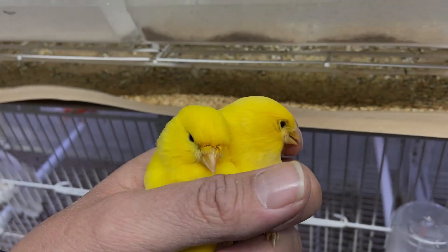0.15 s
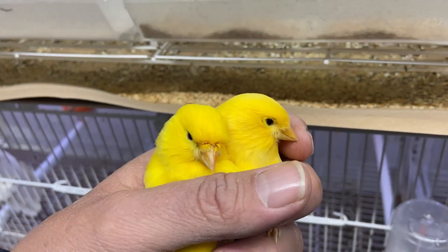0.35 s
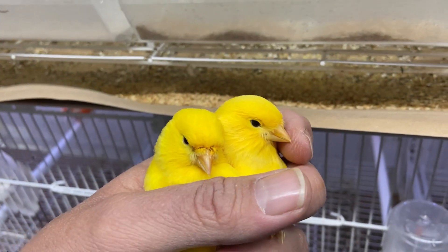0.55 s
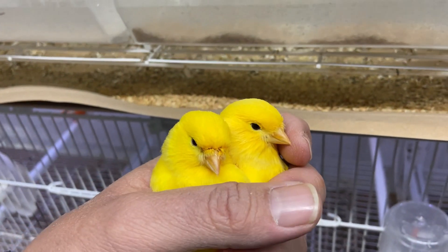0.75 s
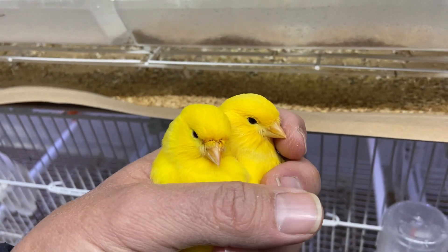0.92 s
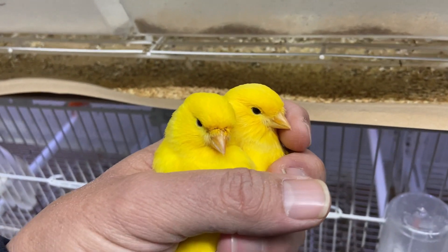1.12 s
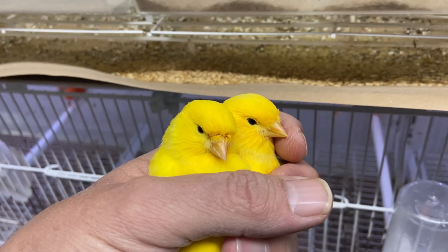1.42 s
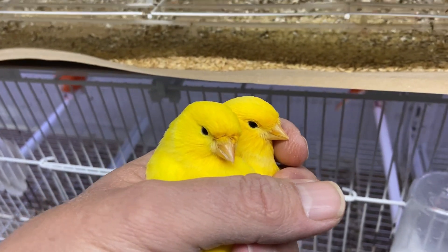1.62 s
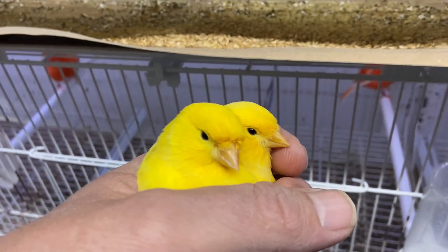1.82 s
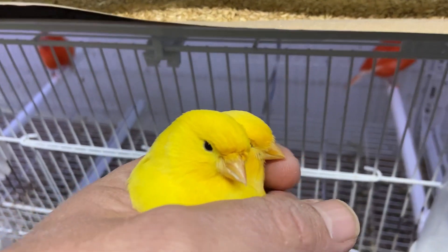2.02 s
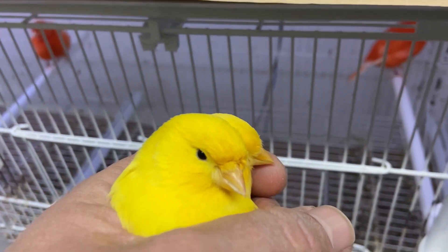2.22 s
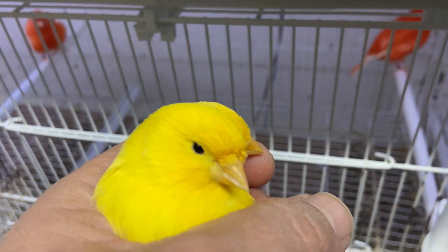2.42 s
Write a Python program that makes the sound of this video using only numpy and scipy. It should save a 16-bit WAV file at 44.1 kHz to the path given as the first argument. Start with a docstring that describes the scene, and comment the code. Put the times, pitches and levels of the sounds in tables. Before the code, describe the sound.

A canary trills in fast, high repeated notes close by in an indoor aviary.

```python
"""A canary trills close by in an indoor aviary: each nearly pure note holds near 3 kHz, then slurs down
and interferes with its own echoes. Another bird throws in a squeal and a few whistles, and faint cheeps
come from other cages. Hands rustle and bump near the microphone, and cage wire ticks over faint room
noise. Just past halfway, the sound drops out twice for an instant."""
import sys
import numpy as np
from scipy import signal
from scipy.fft import rfft, irfft, next_fast_len
from scipy.io import wavfile
from scipy.ndimage import uniform_filter1d

SR = 44100
rng = np.random.default_rng(int(sys.argv[2]) if len(sys.argv) > 2 else 0)


def to_wav(s):
    """Save 16-bit WAV."""
    ch = np.atleast_2d(s).T  # columns
    pcm = np.round(np.clip(ch, -1, 1) * 32767)  # PCM
    wavfile.write(sys.argv[1], SR, pcm.astype(np.int16))


N = 112454
T = np.arange(N) / SR
FREQS = np.fft.rfftfreq(N, 1 / SR)
RELEASE_S = 0.0017  # of every bird note


def canary_trill(attack_s=0.019, slur_s=0.0205, slur_fade_db=8, fundamental_db=-0.89):
    """Frequency and amplitude modulation: notes swell on a held pitch, then fade as they slur down."""
    # (start [s], hold [s], first pitch [Hz], pitch ending the hold [Hz], last pitch [Hz],
    #  relative level [dB], swell over the hold [dB])
    notes = [(-0.0115, 0.0495, 2735, 2852, 2574, -33, 7), (0.086, 0.04, 2995, 3008, 2820, -23, 6.5),
             (0.182, 0.041, 3018, 3062, 2803, -23.5, 24), (0.282, 0.038, 3015, 3090, 2710, -22.5, 18.5),
             (0.38, 0.039, 3042, 3089, 2706, -22, 26.5), (0.481, 0.033, 3015, 3076, 2710, -21.5, 24.5),
             (0.5729, 0.042, 3010, 3084, 2800, -22, 24.5), (0.6805, 0.04, 3080, 2980, 2645, -24.5, -2),
             (0.777, 0.038, 3048, 3020, 2650, -23, 3.5), (0.8807, 0.032, 2995, 2999, 2657, -22, -1),
             (0.98, 0.039, 3042, 2950, 2604, -24, 0.5), (1.083, 0.045, 3063, 2897, 2526, -26.5, 3.5),
             (1.1756, 0.052, 3115, 2872, 2560, -25, 7), (1.292, 0.0415, 3060, 2843, 2515, -26.5, -1),
             (1.391, 0.065, 2984, 2872, 2330, -25.5, 2.5), (1.517, 0.042, 3060, 2875, 2400, -25, 23.5),
             (1.625, 0.039, 3066, 2846, 2420, -25.5, 1), (1.729, 0.0405, 2995, 2923, 2490, -24.5, 3.5),
             (1.833, 0.044, 3064, 2940, 2530, -23.5, 11), (1.94, 0.041, 3003, 2867, 2440, -23.5, 9.5),
             (2.0473, 0.045, 3016, 2892, 2496, -22.5, 4.5), (2.1557, 0.042, 3018, 2864, 2510, -22, 12.5),
             (2.2589, 0.045, 2998, 2856, 2530, -22.5, 2), (2.369, 0.039, 3058, 2890, 2460, -21.5, 4.5),
             (2.4758, 0.044, 2997, 2872, 2460, -25.5, -1)]
    # harmonics 2 to 5 (relative level [dB])
    overtones_db = [-33.5, -29, -35, -40.5]
    pure, overtones = np.zeros((2, N))
    waver = 1 + 0.001 * wander(300)
    flutter_db = 0.7 * wander(70)
    for start, hold, first_hz, knee_hz, last_hz, db, swell_db in notes:
        on = (T >= start) & (T < start + hold + slur_s)
        t = T[on] - start
        held = np.minimum(t / hold, 1)
        slur = np.clip((t - hold) / slur_s, 0, 1)
        hz = first_hz + (knee_hz - first_hz) * held + (last_hz - knee_hz) * slur ** 1.1
        phase = 2 * np.pi * np.cumsum(hz * waver[on]) / SR
        gate = np.minimum(t / attack_s, 1) * np.clip((hold + slur_s - t) / RELEASE_S, 0, 1)
        contour_db = flutter_db[on] - swell_db * (1 - held) - slur_fade_db * slur
        pure[on] += gate * amp(db + fundamental_db + contour_db) * np.sin(phase)
        harmonics = sum(amp(level) * np.sin(k * phase) for k, level in enumerate(overtones_db, 2))
        overtones[on] += gate * amp(db) * (1 - slur) ** 3 * harmonics
    tail = reverberation(pure + overtones, right_db=-5)
    return early_reflections(pure) + at_ears(overtones, right_db=-1) + tail


def second_bird():
    """Harmonic tones plus hiss; the squeal and the main whistle peak on their second harmonic."""
    # contours of six calls (time [s], pitch [Hz], relative level [dB])
    squeal = [(1.15, 2480, -41), (1.162, 2820, -27), (1.185, 3075, -31.5), (1.205, 3012, -33),
              (1.222, 2770, -24.5), (1.238, 2780, -51)]
    whistle = [(1.205, 2320, -55), (1.228, 2331, -21.5), (1.25, 2357, -17), (1.285, 2340, -22.5),
               (1.305, 2266, -43), (1.325, 2400, -60)]
    low_whistle = [(1.21, 2302, -37.5), (1.25, 2376, -59), (1.32, 2294, -46.5), (1.352, 2308, -26.5),
                   (1.372, 2296, -35.5), (1.39, 2190, -44)]
    peep = [(1.258, 3900, -35), (1.28, 3997, -32.5), (1.31, 4090, -55), (1.332, 4050, -36.5),
            (1.348, 4007, -21), (1.365, 4270, -67), (1.4, 4010, -50)]
    chirp = [(1.19, 3400, -55), (1.21, 3620, -30), (1.24, 3840, -46)]
    rasp = [(1.395, 3445, -60), (1.408, 3560, -38), (1.43, 3545, -43), (1.465, 3596, -55),
            (1.52, 3590, -58)]
    # envelope of the hiss in the voice (time [s], level [dB])
    hiss_envelope = [(1.13, -77), (1.155, -45.5), (1.195, -41), (1.225, -34), (1.26, -42), (1.34, -41.5),
                     (1.385, -61), (1.415, -47), (1.47, -57), (1.52, -72)]
    # its spectrum (frequency [Hz], relative density [dB])
    hiss_spectrum = [(1500, -26.5), (2500, -3.5), (3600, 6.5), (5300, -2), (6500, -7.5), (8000, -10),
                     (9200, -24.5), (11500, -8.5), (13200, -10), (15000, -13)]
    # interaural level difference (frequency [Hz], right-ear gain [dB])
    right_ear = [(2000, -4), (5000, -7.5), (8000, -8.5), (16000, 4)]
    voice = (bird_call(squeal, harmonics_db=[-14, 1, -29, -22, -23], jitter=0.01, jitter_hz=605)
             + bird_call(whistle, harmonics_db=[-25.5, 2, -21, -22, -25, -38],
                         jitter=0.0016, jitter_hz=297)
             + bird_call(low_whistle, harmonics_db=[0, -14], jitter=0.0015, jitter_hz=200)
             + bird_call(peep, harmonics_db=[0, -13, -24], jitter=0.024, jitter_hz=500)
             + bird_call(chirp, harmonics_db=[0, -14], jitter=0.015, jitter_hz=600)
             + bird_call(rasp, harmonics_db=[9, -1.5, -7, -7], jitter=0.0206, jitter_hz=620))
    hiss = modulated_noise(hiss_spectrum, hiss_envelope, flicker_db=3, flicker_hz=100)
    direct = at_ears(voice, right_db=log_curve(right_ear, FREQS))
    return direct + amp(-6) * reverberation(voice, right_db=-3.5) + hiss


def distant_cheeps(arch_db=12):
    """Beyond the critical distance, reverberation outweighs the direct sound of other cages' birds."""
    # short glides (start [s], length [s], first pitch [Hz], last pitch [Hz], relative level [dB])
    cheeps = [(0.242, .06, 3820, 4066, -56.5), (0.257, 0.068, 3280, 3390, -50),
              (0.36, 0.056, 2405, 2255, -49.5), (1.201, 0.016, 5250, 5050, -30.5),
              (1.56, 0.024, 4810, 4870, -54.5), (1.568, 0.028, 3400, 3290, -49),
              (1.595, 0.023, 5480, 5270, -56), (1.945, 0.031, 2086, 2100, -52.5),
              (2.174, 0.021, 3615, 3570, -41)]
    voice = np.zeros(N)
    for start, length, first_hz, last_hz, db in cheeps:
        arch = [(start, first_hz, db - arch_db),
                (start + length / 2, (first_hz + last_hz) / 2, db),
                (start + length, last_hz, db - arch_db)]
        voice += bird_call(arch, harmonics_db=[0, -16], jitter=0.012, jitter_hz=403)
    return amp(-2) * voice + amp(6) * reverberation(voice, right_db=-4.5)


def hands():
    """Friction of skin and feathers gives a grainy rustle; handling gives a lumpy rumble."""
    # envelopes (time [s], level [dB])
    rustle_envelope = [(0, -54.5), (.04, -58.5), (.17, -70), (.24, -54), (.33, -86.5), (.4, -66),
                       (.62, -64), (.7, -44.5), (.8, -47), (.9, -52.5), (1.1, -62.5), (1.5, -55.5),
                       (1.57, -52), (1.66, -54.5), (1.82, -58), (1.97, -52.5), (2.1, -69), (2.155, -49),
                       (2.25, -62.5), (2.45, -54), (2.55, -58.5)]
    rumble_envelope = [(0, -50.5), (.12, -60), (.3, -61), (.6, -66.5), (.75, -58), (.88, -49.5),
                       (1.1, -55.5), (1.26, -54.5), (1.35, -47.5), (1.46, -50), (1.57, -42), (1.66, -47),
                       (1.75, -44), (1.81, -50), (1.86, -42), (1.92, -51), (2.03, -49), (2.13, -57),
                       (2.36, -48.5), (2.46, -47), (2.55, -46)]
    # spectra (frequency [Hz], relative density [dB])
    rustle_spectrum = [(100, 1), (230, 1), (700, 1), (1350, 3), (2100, -2), (4000, -8.5), (7000, -12.5),
                       (11500, -17.5), (16000, -24)]
    rumble_spectrum = [(20, -28.5), (33, -21.5), (47, -3), (60, -5), (105, -6.5), (150, -14.5), (250, -18),
                       (450, -24), (1000, -50.5)]
    rustle = modulated_noise(rustle_spectrum, rustle_envelope, flicker_db=2.87, flicker_hz=250)
    rumble = modulated_noise(rumble_spectrum, rumble_envelope, flicker_db=1, flicker_hz=31)
    return rustle + rumble


def wire_ticks(decay_s=0.0028, band_hz=(700, 4500)):
    """Damped transients: cage wire ticks in bursts of noise that decay exponentially."""
    # tick onsets (time [s], level [dB])
    ticks = [(0.159, -53), (0.46, -48.5), (.503, -46.5), (0.687, -41), (1.017, -59), (1.558, -38.5)]
    envelope = sum(amp(db) * (T >= start) * np.exp(-abs(T - start) / decay_s) for start, db in ticks)
    band = signal.butter(1, band_hz, "band", fs=SR, output="sos")
    return envelope * unit_rms(signal.sosfilt(band, rng.standard_normal((2, N))))


def room_noise():
    """Stationary broadband noise sets the aviary's noise floor."""
    # background spectrum (frequency [Hz], relative density [dB])
    air_spectrum = [(22, -24.5), (45, -6), (110, -12), (250, -12.5), (700, -19), (2000, -14), (4000, -25),
                    (7000, -19), (11500, -22.5), (15000, -24)]
    return amp(-59) * stereo_noise(air_spectrum)


def bird_call(contour, harmonics_db, jitter, jitter_hz):
    """A harmonic series on a gliding pitch, roughened by random frequency modulation."""
    hz = curve(contour, T) * (1 + jitter * wander(jitter_hz))
    phase = 2 * np.pi * np.cumsum(hz) / SR
    gate = np.clip(np.minimum(T - contour[0][0], contour[-1][0] - T) / RELEASE_S, 0, 1)
    harmonics = sum(amp(db) * np.sin(k * phase) for k, db in enumerate(harmonics_db, 1))
    return gate * amp(curve(contour, T, column=2)) * harmonics


def early_reflections(x):
    """Interference: echoes from near walls add to the direct sound and beat against a gliding pitch."""
    # reflections at each ear (delay [ms], gain [ratio])
    left_echoes = [(3.583, 0.8), (4.993, 0.12), (10.159, 0.6), (19.891, 0.43), (20.444, 0.55)]
    right_echoes = [(1.903, 0.54), (8.048, 0.26), (13.665, 0.66), (14.574, 0.56), (15.466, 0.69)]
    size = next_fast_len(N + SR // 10)
    f = np.fft.rfftfreq(size, 1 / SR)
    paths = [direct + sum(gain * np.exp(-2j * np.pi * f * ms / 1000) for ms, gain in echoes)
             for direct, echoes in ((1, left_echoes), (0.71, right_echoes))]
    return irfft(rfft(x, size) * np.array(paths), size)[:, :N]


def reverberation(x, right_db, t60_s=0.16, build_s=0.016):
    """The aviary's diffuse field builds up briefly, then decays exponentially."""
    t = T[:SR // 2]
    envelope = amp(-60 * t / t60_s) * np.clip(t / build_s, 0, 1) ** 2
    tail = rng.standard_normal((2, len(t))) * envelope
    tail /= np.linalg.norm(tail, axis=1, keepdims=True)
    return signal.fftconvolve(x[None], tail, axes=1)[:, :N] * amp([[0], [right_db]])


def at_ears(x, right_db, lag_ms=0.019):
    """Interaural time and level differences place a source a little to the left."""
    delay = np.exp(-2j * np.pi * FREQS * lag_ms / 1000)
    return np.array([x, irfft(rfft(x) * amp(right_db) * delay, N)])


def modulated_noise(spectrum, envelope, flicker_db, flicker_hz):
    """Amplitude modulation: noise follows an envelope and flickers randomly about it."""
    return stereo_noise(spectrum) * amp(curve(envelope, T) + flicker_db * wander(flicker_hz))


def stereo_noise(spectrum):
    """Partially coherent coloured noise of rms 1, most alike at the two ears in the bass."""
    # interaural likeness (frequency [Hz], correlation [ratio])
    coherence = [(50, 0.92), (150, 0.99), (350, 0.44), (800, 0.31), (1500, 0), (5000, 0.77), (15000, 0)]
    left, independent = rfft(rng.standard_normal((2, N)))
    shared = log_curve(coherence, FREQS)
    right = shared * left + np.sqrt(1 - shared ** 2) * independent
    return unit_rms(irfft(np.array([left, right]) * amp(log_curve(spectrum, FREQS)), N))


def wander(hz):
    """Low-passed noise: a smooth random fluctuation of rms 1."""
    return unit_rms(irfft(rfft(rng.standard_normal(N)) * np.exp(-(FREQS / hz) ** 2), N))


def curve(points, t, column=1):
    """Linear interpolation in time."""
    rows = np.array(points)
    return np.interp(t, rows[:, 0], rows[:, column])


def log_curve(points, hz):
    """Interpolation on a log-frequency axis."""
    f, value = np.transpose(points)
    return np.interp(np.log(hz + 1), np.log(f), value)


def amp(db):
    """Decibels to amplitude ratio."""
    return 10 ** (np.asarray(db) / 20)


def unit_rms(x):
    """Normalisation to rms 1."""
    return x / np.sqrt(np.mean(x ** 2) + 1e-20)


def scene():
    """Superposition of birds, hands, cage wire and room noise."""
    return canary_trill() + second_bird() + distant_cheeps() + hands() + wire_ticks() + room_noise()


def record(dry, cutoff_hz=15950):
    """Filtering and gating: microphone notches, two brief dropouts, then a low-pass band limit."""
    # dips in the microphone's response (frequency [Hz], width [Hz], depth [dB])
    notches = [(9080, 453, 30.5), (13270, 380, 11)]
    # silent gaps (start [s], end [s])
    dropouts = [(1.4375, 1.458), (1.4805, 1.5055)]
    loss_db = sum(db * np.exp(-((FREQS - hz) / width) ** 2) for hz, width, db in notches)
    heard = irfft(rfft(dry) * amp(-loss_db), N)
    gate = np.ones(N)
    for start, end in dropouts:
        gate[(T > start) & (T < end)] = 0
    gated = heard * uniform_filter1d(gate, size=40)  # edges softened over about 1 ms
    lowpass = signal.firwin(511, cutoff_hz, window=("kaiser", 9), fs=SR)
    return signal.oaconvolve(gated, lowpass[None], "same")


dry = scene()
out = record(dry)
to_wav(out)
```